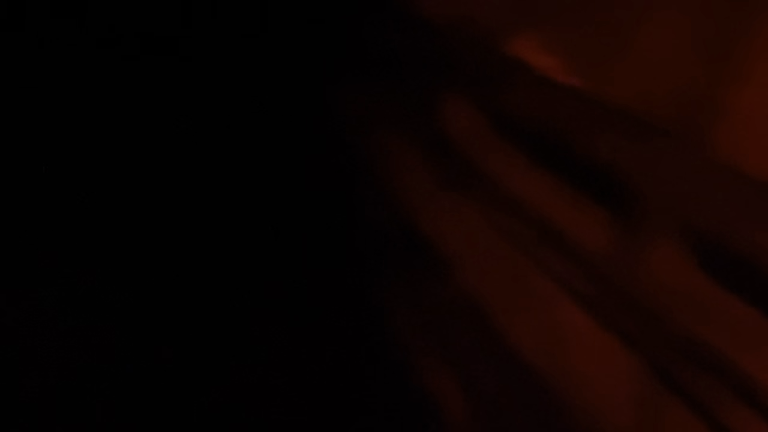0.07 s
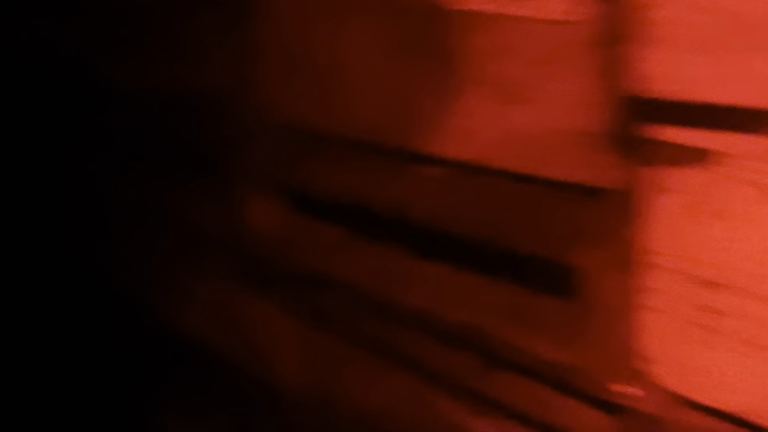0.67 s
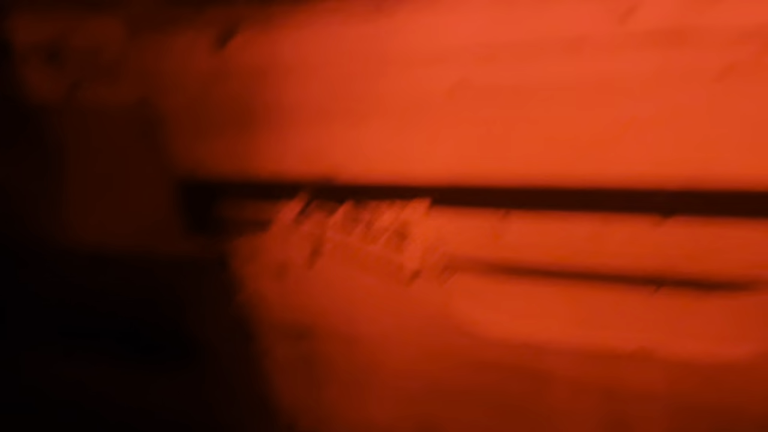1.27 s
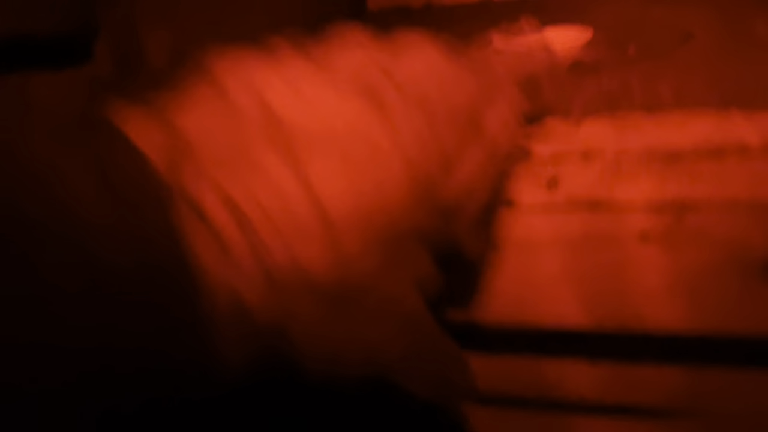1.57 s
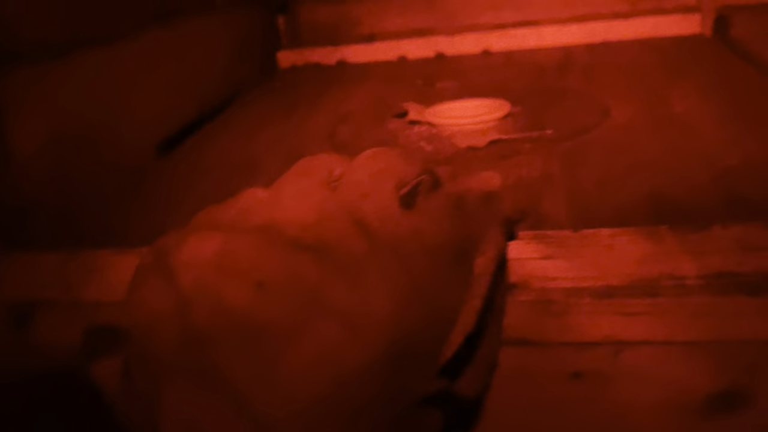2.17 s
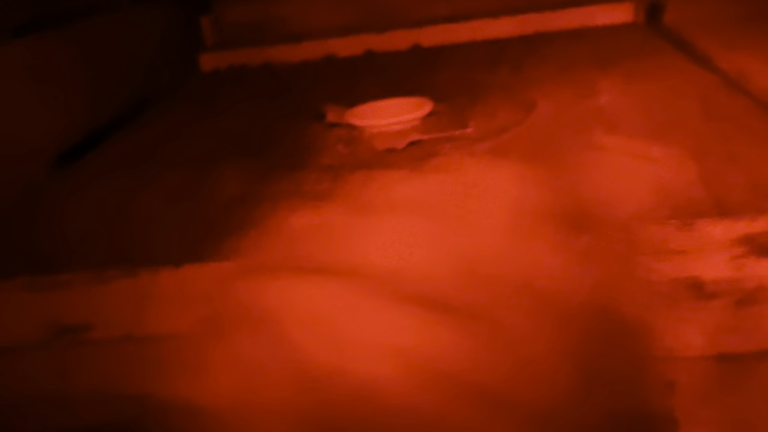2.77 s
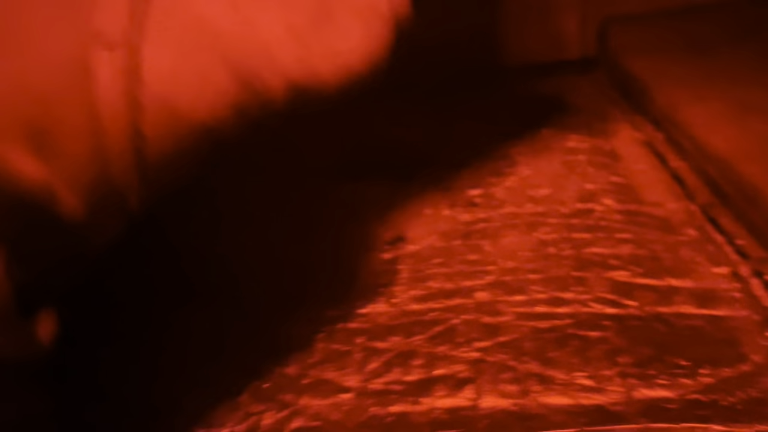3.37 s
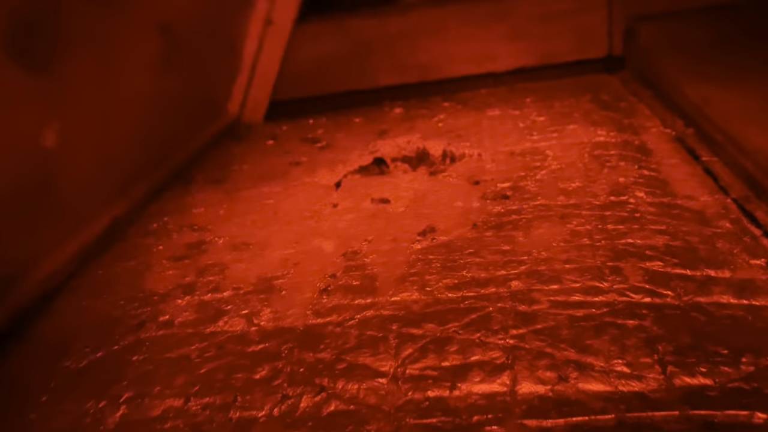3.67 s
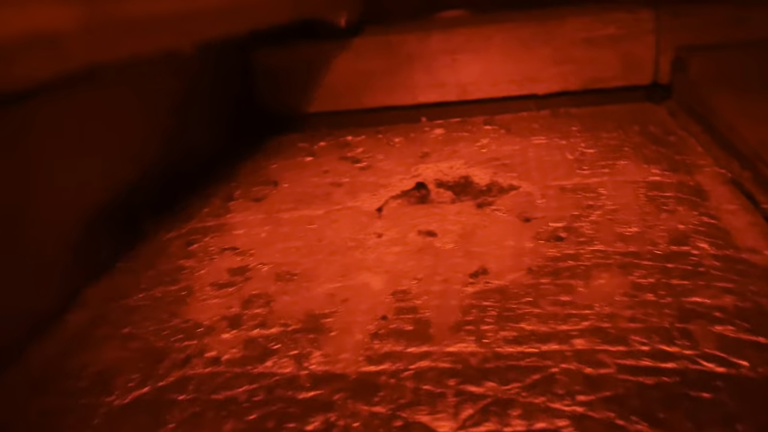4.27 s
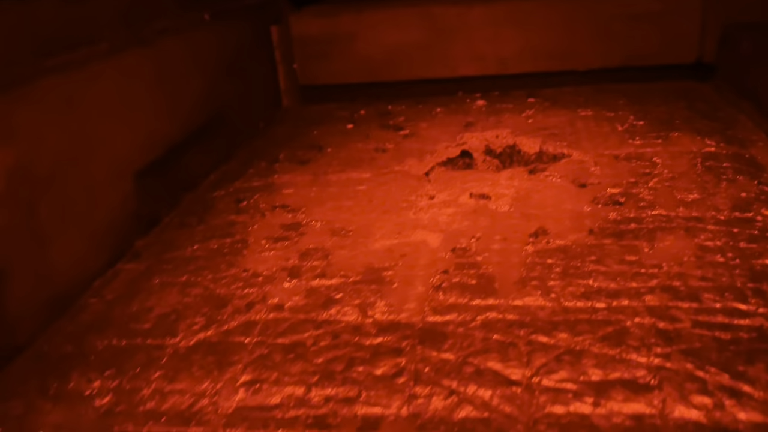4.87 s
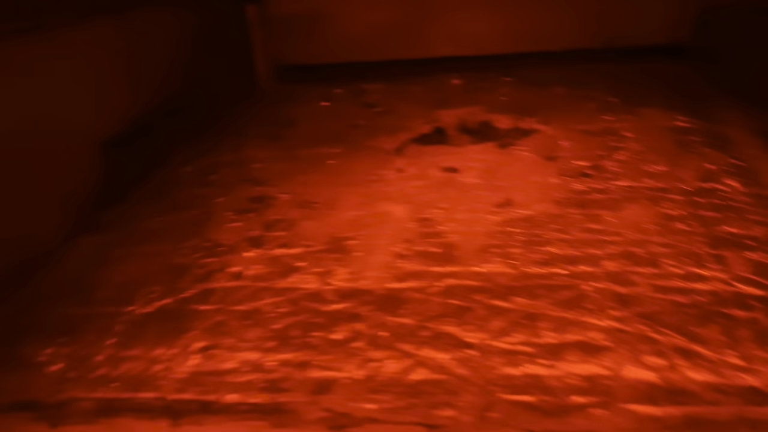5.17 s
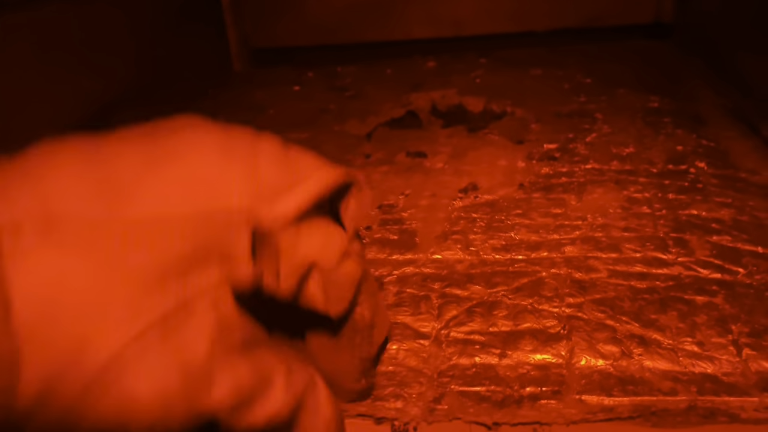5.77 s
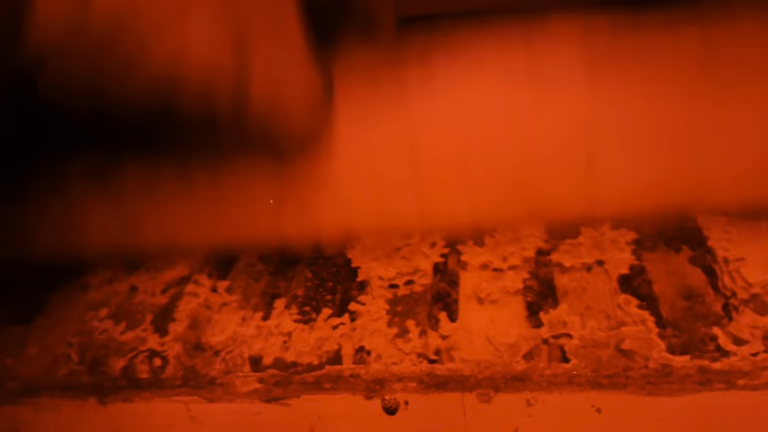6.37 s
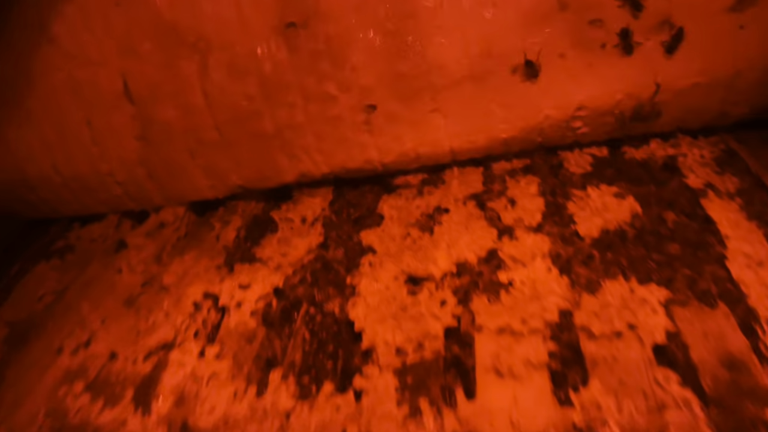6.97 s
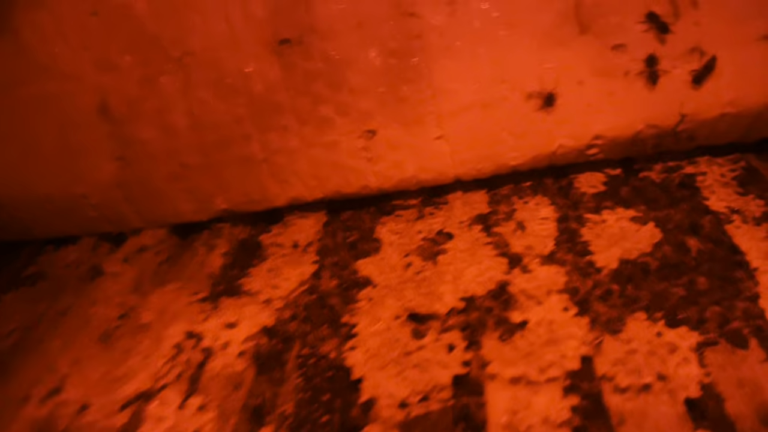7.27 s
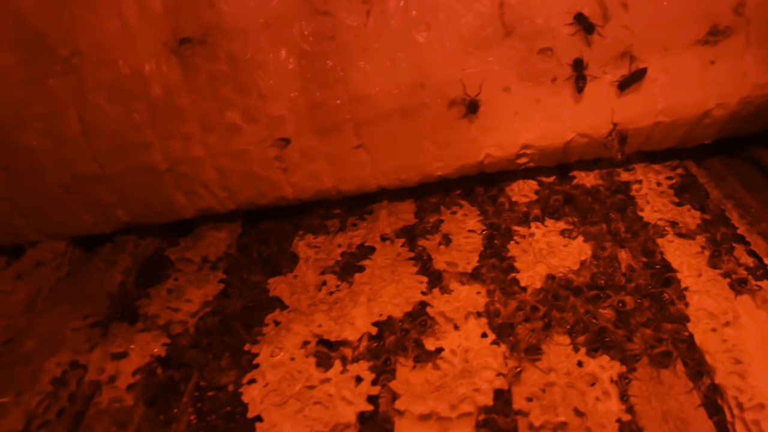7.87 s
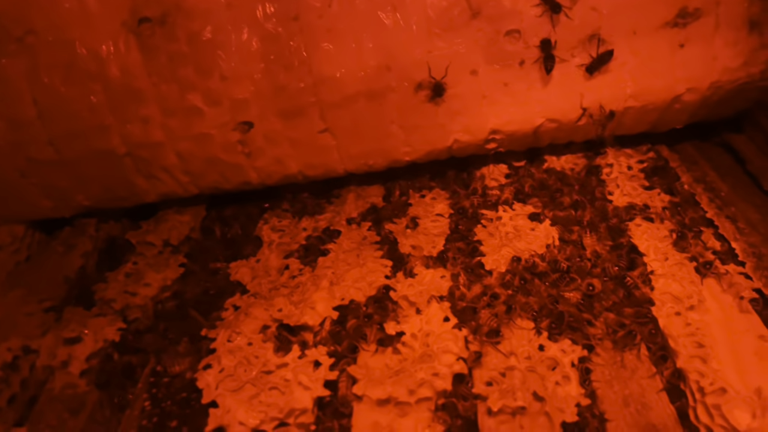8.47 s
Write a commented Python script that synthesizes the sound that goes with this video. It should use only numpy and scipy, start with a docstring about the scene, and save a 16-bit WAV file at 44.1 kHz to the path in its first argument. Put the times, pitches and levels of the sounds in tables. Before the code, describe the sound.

Over a low hum and faint buzzing, a wooden hive lid knocks loose, dull bumps follow, and glued cloth rips up in crackly jerks.

```python
"""In a shed, a wooden beehive is opened close by, over a low hum and the wingbeat buzz of its bees.
The glued-down cover board is prised loose and knocks about; dull bumps follow as it is set aside.
The cloth under it is then peeled off the frames in jerky pulls, its bee glue crackling.
Wood rings in damped modes; each glue thread snaps as a click that rings the spot it was stuck to."""
import sys
import numpy as np
from scipy import signal
from scipy.fft import rfft, irfft
from scipy.io import wavfile
from scipy.ndimage import uniform_filter1d, minimum_filter1d, map_coordinates

SR = 44100
rng = np.random.default_rng(int(sys.argv[2]) if len(sys.argv) > 2 else 0)


def store_pcm(level_fs):
    """Save levels as 16-bit WAV."""
    pcm = np.round(np.clip(level_fs, -1, 1) * 32767).astype(np.int16)
    wavfile.write(sys.argv[1], SR, np.atleast_2d(pcm).T)


N = 384552

# snap spectra of glue and cloth: freq_hz, level_db
GLUE_SPECTRUM = [(300, -11), (1000, -8), (2000, -10), (2600, -2), (3250, -3), (3800, -2.5), (5000, -3),
                 (6000, -2), (7800, 0), (9500, -4), (11000, -12), (13000, -18.5), (16000, -23)]
CLOTH_SPECTRUM = [(60, -3.5), (150, -1), (330, -1), (630, 0.5), (900, -4), (1400, -0.5), (2200, -6.5),
                  (4000, -54), (12000, -79)]


def amp(db):
    return 10 ** (np.asarray(db) / 20)


def unit_rms(x):
    return x / np.sqrt(np.mean(x ** 2) + 1e-20)


def at_hz(points, hz):
    """Table interpolated over log frequency."""
    freq_hz, value = np.transpose(points)
    return np.interp(np.log(hz + 1), np.log(freq_hz + 1), value)


def gain_curve(points):
    """Gain per sample from rows of time_s, level_db."""
    return amp(np.interp(np.arange(N) / SR, *np.transpose(points)))


def gesture(full_s, rise_s, hold_s, release_s):
    """Gain of one movement: up 30 dB over the rise, held, down 30 dB over the release."""
    t = np.arange(N) / SR - full_s
    return amp(-30 * (np.maximum(-t / rise_s, 0) + np.maximum((t - hold_s) / release_s, 0)))


def add(mix, start_s, sound):
    part = mix[..., round(start_s * SR):][..., :sound.shape[-1]]
    part += sound[..., :part.shape[-1]]


def stereo_pair(left, other, coherence, hz):
    """Two unrelated spectra become a partly alike pair, the treble out of phase."""
    # left-right phase shift: freq_hz, phase_rad
    phase_shift = [(100, 0), (5500, 0), (6100, 1), (6600, 3), (7800, 3.4), (9000, 4.4), (10600, 6.2),
                   (11600, 6.4), (14000, 9.4)]
    coherence = np.clip(coherence, -1, 1)
    right = coherence * left + np.sqrt(1 - coherence ** 2) * other
    return np.array([left, right * np.exp(1j * at_hz(phase_shift, hz))])


def wavering(centre_hz, width_hz):
    """Unit-RMS tone, widened by its wandering phase."""
    wander = np.cumsum(rng.standard_normal(N)) * np.sqrt(2 * np.pi * width_hz / SR)
    wander = uniform_filter1d(wander, size=max(int(SR / (2 * np.pi * width_hz)), 1))
    return unit_rms(np.sin(2 * np.pi * centre_hz * np.arange(N) / SR + wander))


def drift(rate_hz):
    """Smooth unit-RMS curve through rate_hz random points a second."""
    position = np.linspace(0, N / SR * rate_hz, N)
    return unit_rms(map_coordinates(rng.standard_normal(400), [position], order=3, mode="wrap"))


def air(level_db=-29.5, patch_db=1.43, rumble_hz=150, size=1024):
    """Rumble and hiss, drifting in small patches; the rumble varies as the listener moves about."""
    # shed air: freq_hz, relative_db
    spectrum = [(24, -39), (42, 2.5), (75, 3), (140, -0.5), (215, -3), (400, -5), (800, -13), (1600, -19.5),
                (1900, -24.5), (3200, -27.5), (5000, -36), (8600, -38), (12500, -55.5), (16000, -74)]
    # its left-right likeness: freq_hz, coherence
    coherence = [(60, 0.9), (150, 0.94), (300, 0.73), (640, -0.23), (1000, -0.2), (1500, 0.035),
                 (2300, 0.64), (3500, 0.19), (4700, 0.64), (6200, 0.63), (7200, 1), (16000, 0.22)]
    # rumble along the way: time_s, gain_db
    rumble_gain = [(0, -3.5), (1.4, -6.5), (2.2, -4.5), (2.8, -3), (4.4, 2.5), (5.6, -5.5), (7, -5),
                   (8.72, -8)]
    hz, hop = np.fft.rfftfreq(size, 1 / SR), size // 4
    a, b, c, d, patches = rng.standard_normal((N // hop + 5, len(hz), 5)).transpose(2, 0, 1)
    patches = uniform_filter1d(patches, size=14, axis=0)  # over time
    patches = unit_rms(uniform_filter1d(patches, size=6, axis=1))  # over frequency
    bins = stereo_pair(a + 1j * b, c + 1j * d, at_hz(coherence, hz), hz) * amp(patch_db * patches)
    noise = signal.istft(bins.swapaxes(1, 2), nperseg=size, noverlap=size - hop)[1][:, :N]
    colour = amp(at_hz(spectrum, np.fft.rfftfreq(N, 1 / SR)))
    noise = amp(level_db) * unit_rms(irfft(rfft(noise) * colour, N))
    lowpass = signal.butter(3, rumble_hz, fs=SR, output="sos")
    return noise + signal.sosfiltfilt(lowpass, noise * (gain_curve(rumble_gain) - 1))


def hum():
    """Wavering low tones, mains hum and a faint whirr passed on the way to the hive."""
    # low tones: pitch_hz, level_db, width_hz
    partials = [(42.6, -54, 3.6), (83.7, -41.5, 8.6), (180.2, -47.5, 8.25), (211, -40.5, 7.7),
                (366.6, -51, 12.6), (464, -56, 15.2), (750, -65, 19.2)]
    # mains hum: time_s, level_db
    mains_level = [(0, -34), (1.5, -37), (2.3, -39.5), (4.5, -41), (8.72, -39)]
    tones = sum(amp(db) * wavering(hz, width_hz) for hz, db, width_hz in partials)
    mains = gain_curve(mains_level) * wavering(119.3, width_hz=2.8)
    passing = gesture(full_s=1.6, rise_s=2.8, hold_s=0.47, release_s=2.4)
    return tones + mains + amp(-64) * passing * wavering(1600, width_hz=69)


def bees(waver=0.018, waver_hz=9.0, swell_db=5.0, swell_hz=3.5, harmonics=12):
    """Wingbeats of the nearest bees: each buzz wavers in pitch, swells and drifts sideways."""
    # harmonic envelope: freq_hz, level_db
    spectrum = [(200, 2.5), (420, -8), (650, -13), (900, -19.5), (1250, -18), (1560, -14), (1900, -25),
                (3000, -24)]
    # single bees: wingbeat_hz, relative_db
    wings = [(168, -2), (187, -4.5), (212, 1), (236, -8)]
    # whole colony: time_s, gain_db
    colony = [(0, -46), (2.6, -40), (4, -41), (6.5, -45.5), (7.7, -41.5), (8.72, -46)]
    out = np.zeros((2, N))
    for wing_hz, db in wings:
        phase = 2 * np.pi * np.cumsum(wing_hz * (1 + waver * drift(waver_hz))) / SR
        buzz = sum(amp(at_hz(spectrum, k * wing_hz)) * np.sin(k * phase + 2 * np.pi * rng.random())
                   for k in range(1, harmonics + 1))
        pan = 0.34 * drift(swell_hz) * np.array([[1], [-1]])
        out += (1 + pan) * amp(db) * unit_rms(buzz * amp(swell_db * drift(swell_hz)))
    return out * gain_curve(colony)


def struck_wood(hits, modes, contact_q, pan_spread=0.078, size=14000):
    """Wood rings in its modes; contact favours those near its pitch, a grip shortens the ring."""
    out, t = np.zeros((2, N)), np.arange(size) / SR
    for start_s, db, contact_hz, ring_factor in hits:
        pans = 1 + pan_spread * rng.standard_normal((len(modes), 1, 1)) * np.array([[1], [-1]])
        wood = sum(pan * amp(mode_db - 60 * t / (t60_s * ring_factor)) * np.sin(2 * np.pi * hz * t)
                   for pan, (hz, mode_db, t60_s) in zip(pans, modes))
        contact = signal.iirpeak(contact_hz, contact_q, SR)
        wood = signal.lfilter(*contact, signal.lfilter(*contact, wood))
        add(out, start_s, amp(db) * wood / abs(wood.mean(0)).max())
    return out


def box_bumps(rock_lag_s=0.015, rock_db=-6.5, rock_hz=70, rock_ring=0.89):
    """Each dull bump rings the hive box, then rocks its stand."""
    # box and stand: pitch_hz, level_db, t60_s
    modes = [(52, -21, 0.092), (74, -8, 0.16), (111, 2.5, 0.075), (167, 10.5, 0.033), (201.7, 2, 0.16),
             (334, 0.5, 0.085), (380, 0.5, 0.15)]
    # bumps: start_s, level_db, contact_hz, ring_factor
    bumps = [(1.667, -17, 70.6, 1.1), (2.98, -23, 78.6, .7), (3.079, -14, 79.5, 0.54),
             (3.426, -13, 153, 0.56), (3.931, -26, 80, 0.43), (4.199, -19.5, 82, 2.2),
             (4.441, -10, 190, 1.2), (4.686, -11, 161, 0.63), (4.914, -8, 188, 1.3),
             (5.307, -16.5, 61.5, 0.52), (6.272, -9, 117, 1.9), (6.786, -16, 70, 0.71)]
    rocks = [(start_s + rock_lag_s, db + rock_db, rock_hz, rock_ring) for start_s, db, _, _ in bumps]
    return struck_wood(bumps + rocks, modes, contact_q=1.0)


def spot_hz(centre_hz, spread_octaves=0.616):
    """Pitch of a random spot on the frames."""
    return centre_hz * 2 ** (spread_octaves * rng.standard_normal())


def snap(spectrum, ring_hz, scatter_s=0.0025, ring_db=7, relative_width=0.062, size=1024):
    """One glue thread breaks: a click that rings its spot and scatters off the frames."""
    # frame resonances: centre_hz, width_hz, lift_db
    resonances = [(1500, 150, 2), (2200, 140, 1.5), (3200, 380, 4.5), (4730, 220, 0), (5490, 230, -0.5)]
    # left-right likeness close by: freq_hz, coherence
    coherence = [(100, 1), (600, 0.89), (1400, 0.78), (2300, 0.63), (3400, 0.41), (4600, 0.81),
                 (6200, 0.67), (7200, 0.94), (15000, 0.83)]
    t, hz = np.arange(size) / SR, np.fft.rfftfreq(size, 1 / SR)
    click = 0.26 * rng.standard_normal((2, size)) * np.exp(-t / scatter_s)
    click[0, 0] += 1
    click[1] *= np.linalg.norm(click[0]) / np.linalg.norm(click[1])
    two_sided_hz = abs(np.fft.fftfreq(size, 1 / SR))
    gain_db = at_hz(spectrum, two_sided_hz)
    gain_db += ring_db / (1 + ((two_sided_hz / ring_hz - 1) / (relative_width / 2)) ** 2)
    for centre_hz, width_hz, lift_db in resonances:
        gain_db += lift_db / (1 + ((two_sided_hz - centre_hz) / (width_hz / 2)) ** 2)
    minimum_phase = np.exp(np.conj(signal.hilbert(np.log(amp(gain_db)))))[:len(hz)]
    bins = stereo_pair(*rfft(np.roll(click, 20, axis=1)), at_hz(coherence, hz), hz)
    pair = irfft(bins * minimum_phase)
    return pair / np.sqrt(np.sum(pair ** 2) / 2)


def glue_cracks(gain_db=2):
    """Single dry ticks as brittle glue lets go."""
    # cracks: start_s, level_db, body_to_treble_db, ring_hz
    cracks = [(2.424, -29, 2, 3700), (2.532, -25, -3, 4300), (2.98, -14, 3, 3310), (3.002, -17, 17, 1800),
              (3.401, -22.5, -5, 4970), (3.511, -26, -2, 9500), (3.553, -13.5, -2, 7940),
              (3.653, -21, -14, 9500), (3.6608, -5.5, -19, 9400), (4.162, -23, -1.5, 8160),
              (4.238, -30, 0, 8100), (5.818, -21, -12, 4500), (5.839, -20, -14, 4500),
              (5.861, -19, -14, 9500), (5.881, -15, -8, 5000), (5.889, -14, -12, 5110),
              (5.919, -16, -13, 4300), (5.9392, 0, -12.5, 2940), (5.993, -19, -10, 6000),
              (6.016, -21, -5, 3060), (6.141, -14.5, -25, 9500), (6.172, -11, -13, 8800),
              (6.1975, -6, 3, 3100), (6.2085, -1, -29, 4450), (6.224, 3, -6, 3180),
              (6.232, -2.5, -14, 3700), (6.2433, -7, -1, 3300), (6.273, -2.5, -8, 3320),
              (6.324, 4, -18, 4350), (6.350, -10, 1, 4400), (6.387, -6.5, -1, 3300),
              (6.425, -8.5, -3, 2790), (6.522, -11.5, -16, 2920), (6.569, -10, -6, 3200),
              (6.5773, -8, -10, 3200), (6.5841, -6, -6, 3110), (6.590, -10, 2, 2860),
              (6.614, -6, -14.5, 2280), (6.6255, -3.5, -5, 3320), (6.642, -0.5, 1, 3170),
              (6.6724, 1.5, -3, 2360), (6.686, 0, -11, 4990), (6.715, -4.5, -8, 3400),
              (6.7262, -8, 0, 3400), (6.7713, -6, -19, 4970), (6.787, -9, 3, 1500), (6.794, -6, -2, 2200),
              (6.801, -3, -6, 2200), (6.813, -7, -11, 4500), (6.827, -7, -6, 9000),
              (6.8544, -1.5, -1, 2930), (6.8886, -3, -11, 3600), (6.9305, -10.5, -16, 9500),
              (7.028, -29, -25, 11000), (7.079, -21, -22, 4300), (7.355, -31, -25, 10500)]
    out = np.zeros((2, N))
    for start_s, db, body_db, ring_hz in cracks:
        treble = snap(GLUE_SPECTRUM, ring_hz, scatter_s=0.0012, relative_width=0.11)
        tick = treble + amp(body_db) * snap(CLOTH_SPECTRUM, spot_hz(1410))
        add(out, start_s, amp(db + gain_db) * tick / abs(tick).max())
    return out


def grains(spectrum, per_s, spread_db, ring_hz, spots=12):
    """Unit-RMS shower of uneven snaps from several spots."""
    strength = amp(spread_db * np.minimum(rng.exponential(1, N), 3)) * rng.choice([-1, 1], N)
    train = strength * (rng.random(N) < per_s / SR)
    spot = rng.integers(0, spots, N)
    shower = sum(signal.oaconvolve((train * (spot == k))[None], snap(spectrum, spot_hz(ring_hz)), axes=1)
                 for k in range(spots))
    return unit_rms(shower[:, :N])


def friction():
    """Fine grit: hand and board on wood, fingers on cloth, then uncovered bees on the frames."""
    # strokes: full_s, rise_s, hold_s, release_s, level_db
    strokes = [(2.663, 2.2, 0.2, 0.54, -51.5), (3, 0.049, 0.048, 0.16, -36),
               (3.257, 0.038, .012, 0.21, -38), (3.54, 0.27, 0.13, 0.22, -42),
               (3.842, 0.12, 0.02, 0.25, -42), (4.3, 5, 1.4, 2.0, -54.5), (5.715, 0.078, 0.026, 0.044, -39),
               (7.02, 0.22, 0.37, .6, -51.5)]
    # rubbing: freq_hz, level_db
    spectrum = [(300, -8), (1500, 3), (3500, 0), (6000, 1.5), (9500, 0.5), (13000, -15.5), (16000, -16)]
    rubbing = sum(amp(db) * gesture(*timing) for *timing, db in strokes)
    rustle = amp(-56) * gesture(full_s=7.65, rise_s=0.21, hold_s=N / SR, release_s=1)
    return grains(spectrum, per_s=4400, spread_db=10.5, ring_hz=6000) * (rubbing + rustle)


def seal_split():
    """The board splits from its seal and rings the rim that held it."""
    # split: start_s, level_db, contact_hz, ring_factor
    split = [(2.979, -24, 3400, 1)]
    # rim: pitch_hz, level_db, t60_s
    modes = [(2420, -8, 0.049), (3130, -3, 0.027), (3500, 0, .035), (5100, -3, .025)]
    return struck_wood(split, modes, contact_q=0.4)


def board_knocks(clack_lead_s=0.00101, clack_hz=1166, clack_ring=0.72):
    """The edge clacks, then the whole board thuds; dragged, it catches in step with its own ring."""
    # cover board: pitch_hz, level_db, t60_s
    modes = [(184, 1, 0.083), (230, 10, 0.16), (326, 4, 0.035), (370.3, 3, 0.11), (452, 4.5, 0.035),
             (554, -5, 0.096), (742, -6.5, 0.1), (940, -3, 0.034), (1250, -8, 0.028), (1450, -21, 0.075),
             (2800, 2, 0.017), (3400, 9, 0.0088)]
    # knocks: start_s, level_db, contact_hz, ring_factor, clack_relative_db
    knocks = [(2.9791, -3, 407, 0.41, -7), (3.068, -3, 420, 0.34, -24), (3.158, -16, 583, 1.6, 3),
              (3.165, -15.5, 318, 2, -34), (3.251, -12.5, 520, 1.4, -10), (3.857, -7.5, 234, 0.79, -19),
              (3.898, -3, 445, 1.16, -33), (3.901, -2.5, 185, 0.38, -12.5), (3.977, -15.5, 380, 1.5, -16)]
    # judders over the rim: start_s, level_db, contact_hz, ring_factor
    judders = [(3.006, -18.5, 433, 0.99), (3.215, -16.5, 380, 1.03)]
    # swing of the board: time_s, left_gain_db
    swing = [(2.98, 1), (3.07, 1.5), (3.2, -1.5), (3.9, -0.5), (4, 3)]
    thuds = [row[:4] for row in knocks]
    clacks = [(start_s - clack_lead_s, db + clack_db, clack_hz, clack_ring)
              for start_s, db, _, _, clack_db in knocks]
    gap_s, step_db = 3 / modes[1][0], 2 / 3  # a catch every third cycle of the strongest mode
    catches = [(start_s + k * gap_s, db + k * step_db, contact_hz, ring_factor)
               for start_s, db, contact_hz, ring_factor in judders for k in range(3)]
    left = gain_curve(swing)
    return struck_wood(thuds + clacks + catches, modes, contact_q=1.38) * np.array([left, 1 / left])


def glue_rips(gain_db=3.0, body_gain_db=2, fade_db=3, threads=7):
    """One thread breaks and takes its neighbours with it, tugging at the cloth."""
    # rips: start_s, length_s, level_db, body_to_treble_db, ring_hz
    rips = [(3.058, 0.0094, -18, 2.5, 3130), (3.262, .009, -16, -2, 3500), (3.897, 0.011, -21.5, -10, 6140),
            (5.905, 0.0068, -9, -7, 3400), (5.9325, 0.0076, -10, -9, 3100), (6.199, 0.0045, -11, -8, 2980),
            (6.2558, 0.011, -2.5, -5, 3560), (6.3066, 0.0081, -4, -7, 3750), (6.33, 0.01, -2, -8.5, 4500),
            (6.404, .005, -11.5, -9, 3780), (6.555, 0.0068, -13.5, -8, 3360),
            (6.599, 0.0079, -6.5, -3.5, 2800), (6.689, 0.0066, -6, 0.5, 3630),
            (6.755, 0.0063, -1, -4, 2440), (6.776, 0.008, -1, -4, 2190), (6.843, 0.0091, -9, -2, 3020),
            (6.861, 0.0097, -4.5, -2.5, 2980), (6.896, 0.0093, -10, -4, 3700)]
    out = np.zeros((2, N))
    for start_s, length_s, db, body_db, ring_hz in rips:
        rip, cloth_hz = np.zeros((2, SR // 10)), spot_hz(1038)
        order = np.arange(threads)
        for progress in (order + rng.random(threads) * (order > 0)) / threads:
            treble = snap(GLUE_SPECTRUM, ring_hz, ring_db=8.0, relative_width=0.13)
            body = amp(body_db + body_gain_db) * snap(CLOTH_SPECTRUM, cloth_hz, scatter_s=0.0019)
            strength = rng.choice([-1, 1]) * amp(-fade_db * progress)
            add(rip, progress * length_s, strength * (treble + body))
        add(out, start_s, amp(db + gain_db) * rip / abs(rip).max())
    return out


def edge_click():
    """A hard edge clicks once as the board swings up."""
    # click: start_s, level_db, contact_hz, ring_factor
    click = [(3.661, -15.5, 2700, 1)]
    # edge: pitch_hz, level_db, t60_s
    modes = [(1400, -3, 0.028), (2520, -12, 0.016), (2670, -5, 0.018), (4030, -13, .009), (4800, -2, 0.016),
             (5830, -3, 0.013)]
    return struck_wood(click, modes, contact_q=0.3)


def stick_slip(slips_per_s=92, decay_s=0.0046, spread_db=9, creep=0.63, count=2000):
    """Gain of cloth that catches and slips at uneven intervals, over a steady creep."""
    jitter, strength = rng.uniform(-1.4, 1, (count, 2)).T
    onsets = abs((np.arange(count) + 0.33 * jitter) * SR / slips_per_s).astype(int)
    impulses = np.bincount(onsets, amp(spread_db * strength), N)[:N]
    slips = signal.lfilter([1], [1, -np.exp(-1 / (decay_s * SR))], impulses)
    return unit_rms(creep + (1 - creep) * unit_rms(slips))


def cloth_peel(crackle_gain_db=-2, rasp_gain_db=-8.5):
    """Countless small threads snap along the cloth's edge as each pull lifts it in jerks."""
    # pulls: full_s, rise_s, hold_s, release_s, crackle_db, rasp_db
    pulls = [(5.902, 0.074, 0.034, 0.048, -21.5, -27), (5.993, 0.048, 0.02, 0.47, -39.5, -53),
             (6.194, 0.029, 0.15, 0.11, -16.5, -19.5), (6.367, 0.063, 0.042, 0.073, -22, -22.5),
             (6.599, 0.1, 0.075, 0.17, -17, -19), (6.758, 0.032, 0.038, 0.055, -18.5, -12.5),
             (6.835, 0.048, 0.0098, 0.13, -15, -12)]
    crackle = amp(crackle_gain_db) * grains(GLUE_SPECTRUM, per_s=1900, spread_db=5, ring_hz=3600)
    rasp = amp(rasp_gain_db) * grains(CLOTH_SPECTRUM, per_s=1000, spread_db=5, ring_hz=1000)
    return stick_slip() * sum(gesture(*timing) * (amp(crackle_db) * crackle + amp(rasp_db) * rasp)
                              for *timing, crackle_db, rasp_db in pulls)


def frame_knocks():
    """A frame lifts with the cloth and drops back."""
    # knocks: start_s, level_db, contact_hz, ring_factor
    knocks = [(6.198, -4.5, 1400, 0.51), (6.6035, -6.5, 604, 0.92), (6.7565, -16, 800, 0.49)]
    # frame: pitch_hz, level_db, t60_s
    modes = [(477, -9, 0.041), (640, 4, 0.038), (980, -2, 0.03), (1420, -20, 0.022), (3100, 13.5, 0.021)]
    return struck_wood(knocks, modes, contact_q=0.76)


def shed_reverb(x, wet_db, predelay_s=0.004, size=14000):
    """Adds a short, weak tail from the plank walls, longest in the midrange."""
    # shed decay: freq_hz, t60_s
    decay = [(100, 0.0082), (1000, 0.07), (5000, 0.039), (14000, 0.013)]
    taps = rng.standard_normal((2, size)) * (np.arange(size) > predelay_s * SR)
    hz, t, bins = signal.stft(taps, SR, nperseg=256)
    tail = signal.istft(bins * amp(-60 * t / at_hz(decay, hz)[:, None]), SR, nperseg=256)[1]
    return x + amp(wet_db) * signal.fftconvolve(x, tail / np.linalg.norm(tail[0]), axes=1)[:, :N]


def scene():
    """Wood and glue close by, a little to the left, over air, hum and bees."""
    wood = box_bumps() + seal_split() + board_knocks() + edge_click() + frame_knocks()
    crackle = (glue_cracks() + friction() + glue_rips() + cloth_peel()) * amp([[0.4], [-0.4]])
    near = shed_reverb(wood, wet_db=-12.0) + shed_reverb(crackle, wet_db=-17.5)
    return (near + air() + hum() + bees()) * amp([[0.3], [-0.3]])


def record(dry, threshold_db=-27, slope=0.2, hold_s=0.59, recovery_db_per_s=18, cutoff_hz=15950):
    """Gain control ducks on loud treble, holds and recovers; then soft clipping and a low-pass."""
    treble = signal.sosfilt(signal.butter(2, 1500, "high", fs=SR, output="sos"), dry)
    power_db = 10 * np.log10(abs(uniform_filter1d((treble ** 2).mean(0), size=600)) + 1e-12)
    excess_db = np.maximum(power_db - threshold_db, 0)
    half_hold = int(hold_s * SR / 2)
    held_db = -minimum_filter1d(-excess_db, 2 * half_hold + 1, origin=half_hold)
    recovery_db = np.arange(N) * recovery_db_per_s / SR
    cut_db = np.maximum.accumulate(slope * held_db + recovery_db) - recovery_db
    ducked = dry / amp(uniform_filter1d(cut_db, size=300))
    rounded = ducked / (1 + (ducked / 0.95) ** 8) ** (1 / 8)
    lowpass = signal.firwin(511, cutoff_hz, window=("kaiser", 9), fs=SR)
    return signal.oaconvolve(rounded, lowpass[None], "same")


dry = scene()
out = record(dry)
store_pcm(out)
```